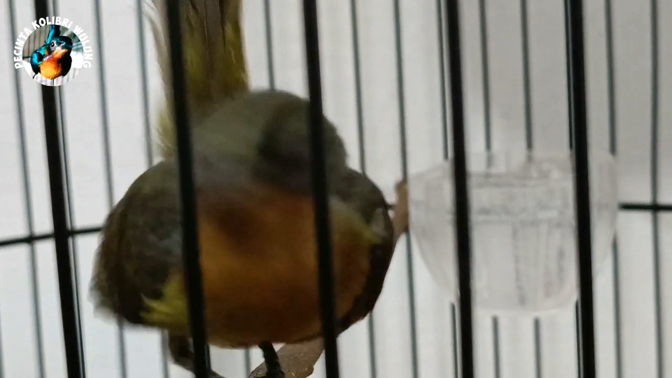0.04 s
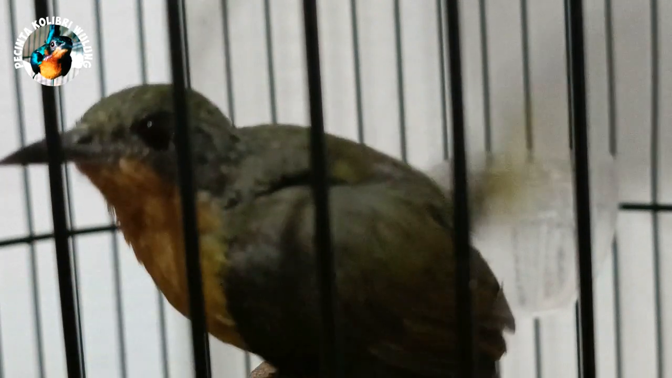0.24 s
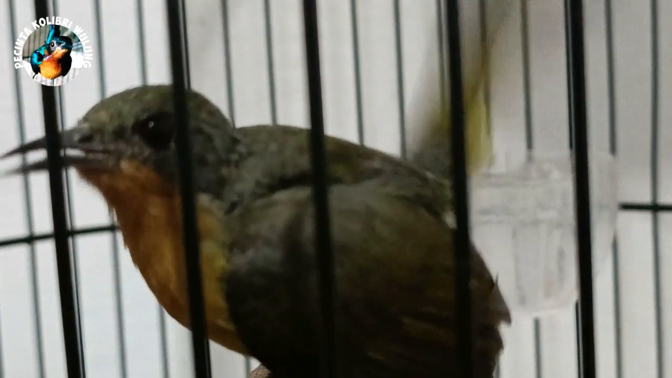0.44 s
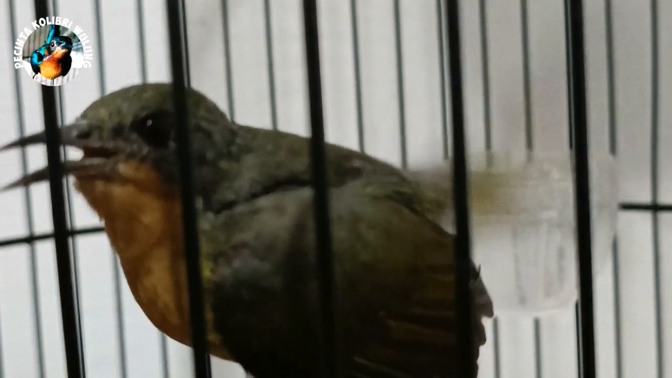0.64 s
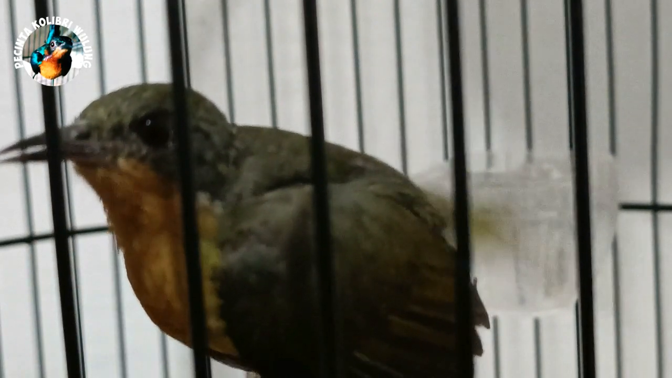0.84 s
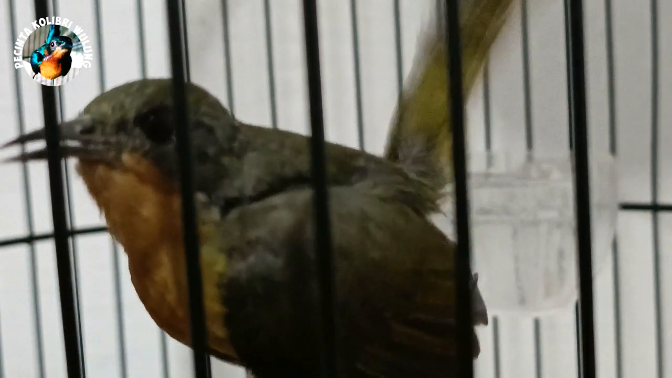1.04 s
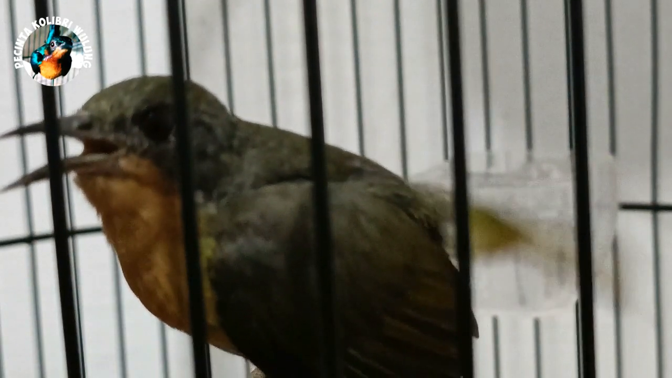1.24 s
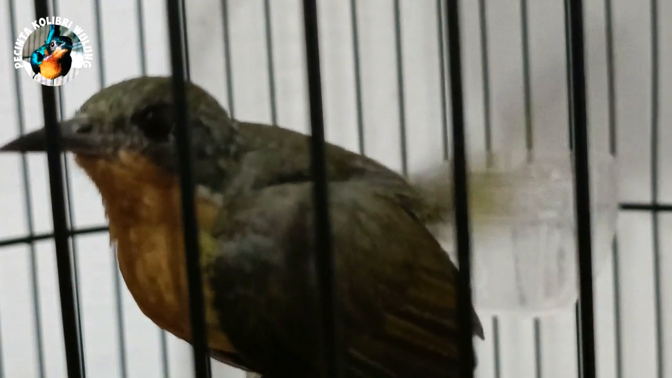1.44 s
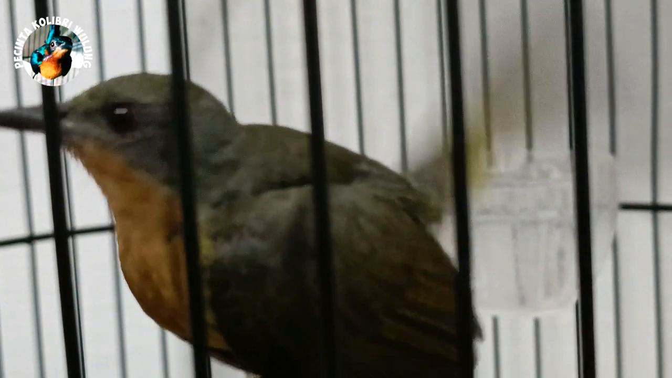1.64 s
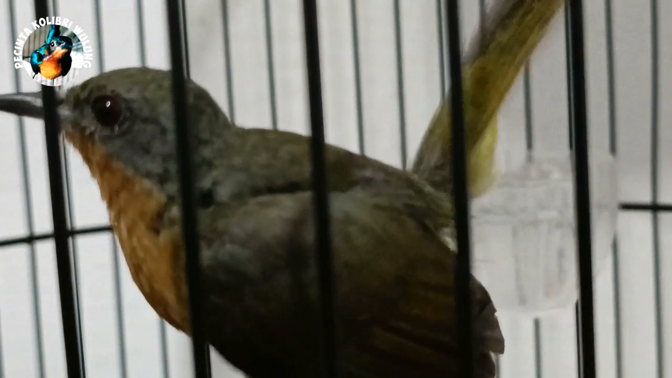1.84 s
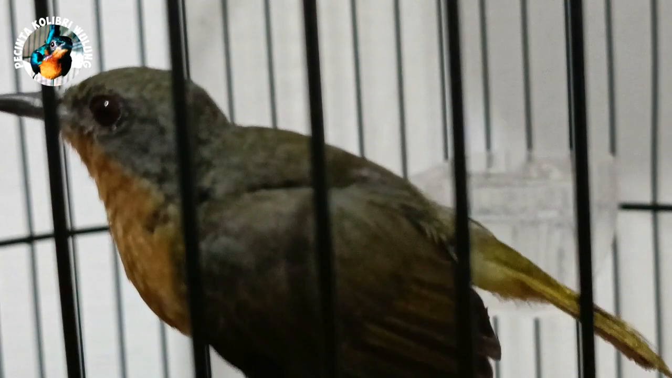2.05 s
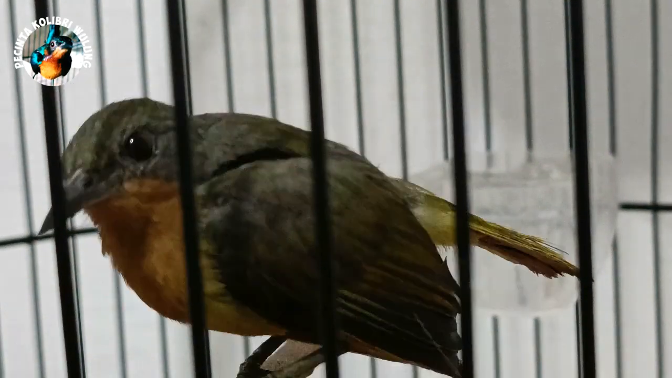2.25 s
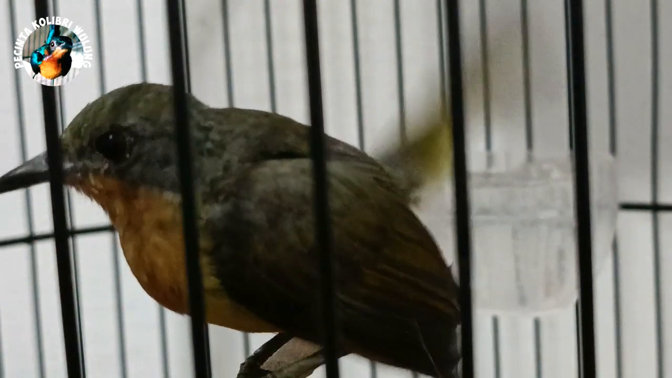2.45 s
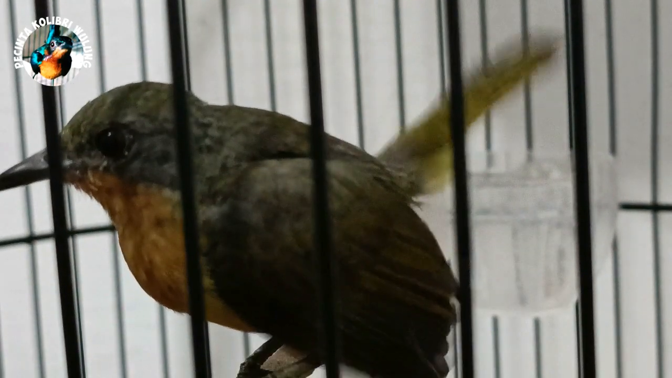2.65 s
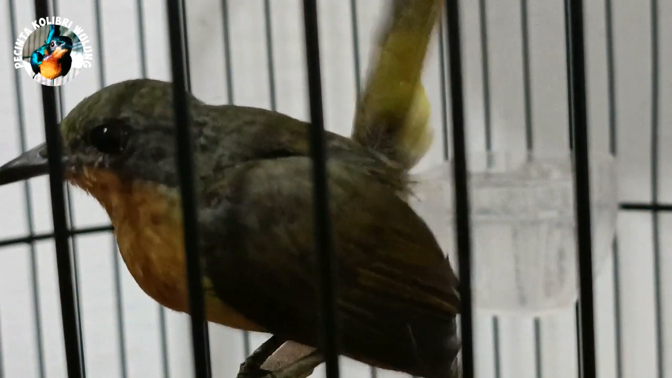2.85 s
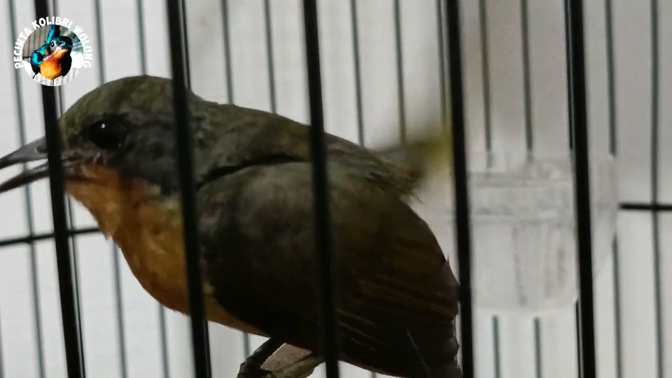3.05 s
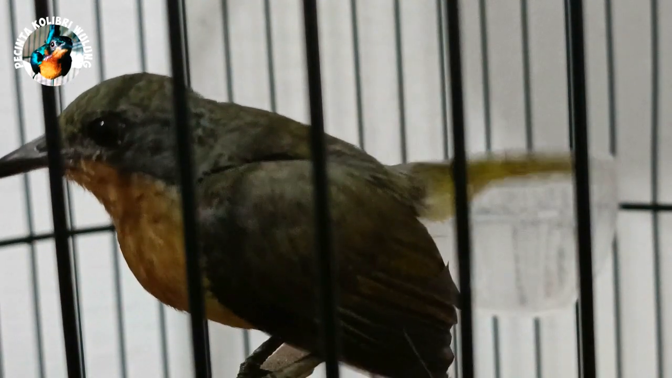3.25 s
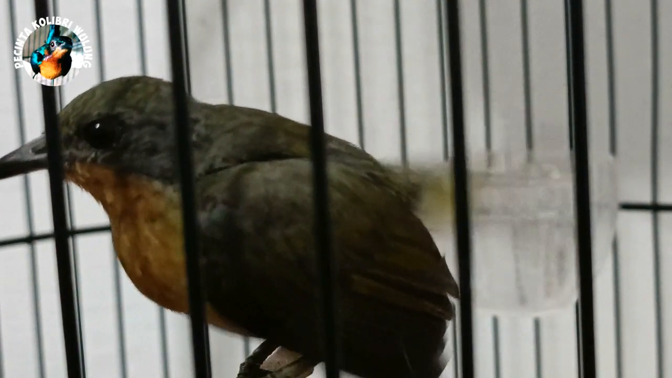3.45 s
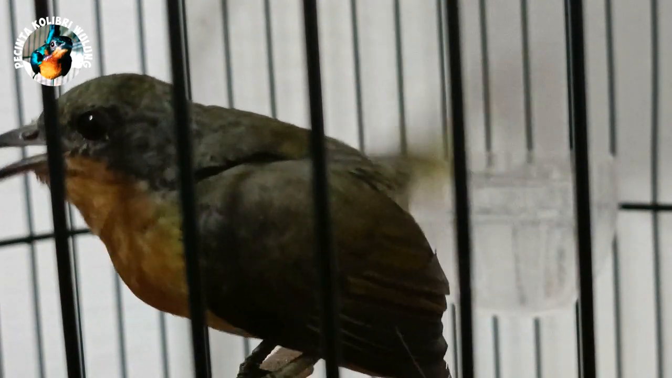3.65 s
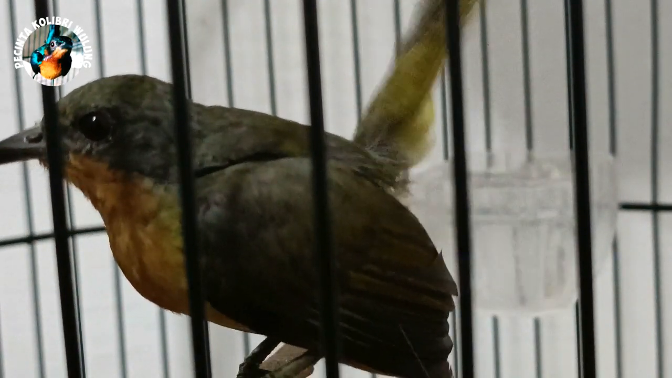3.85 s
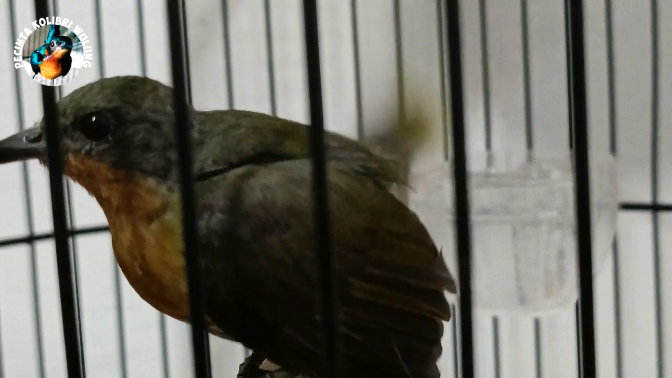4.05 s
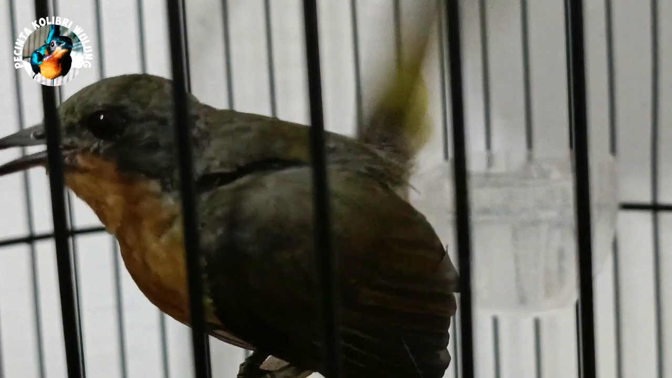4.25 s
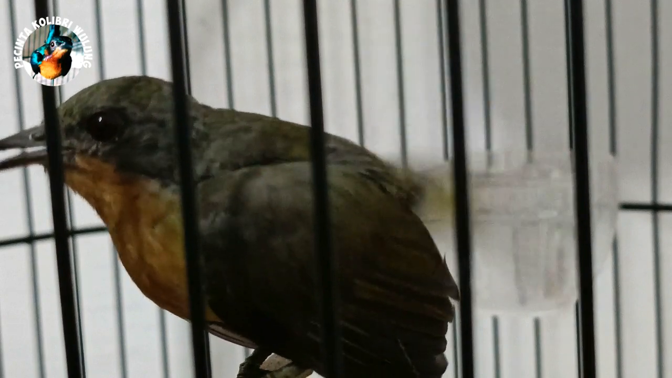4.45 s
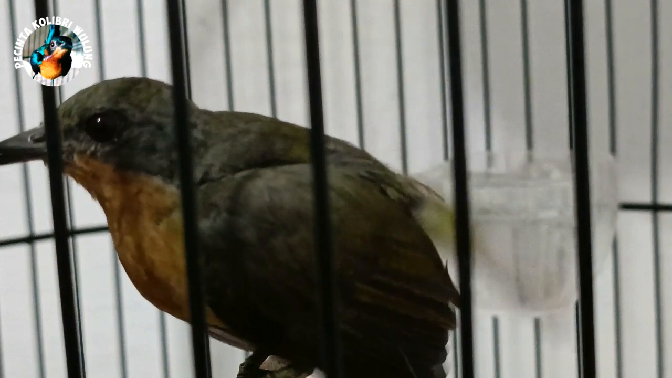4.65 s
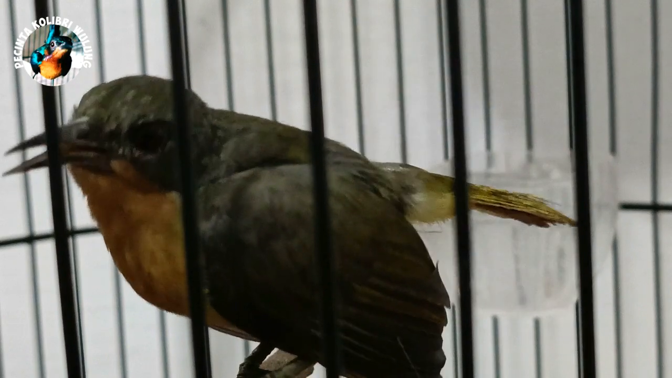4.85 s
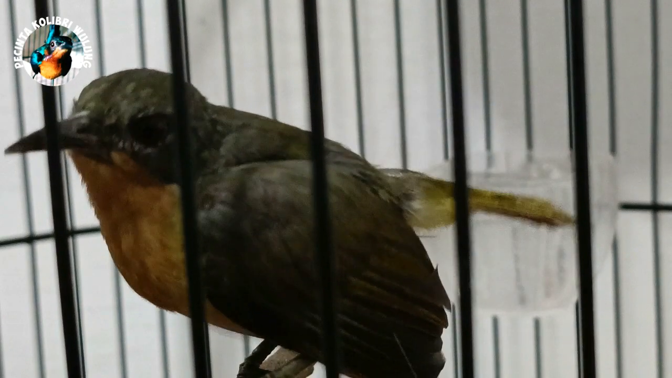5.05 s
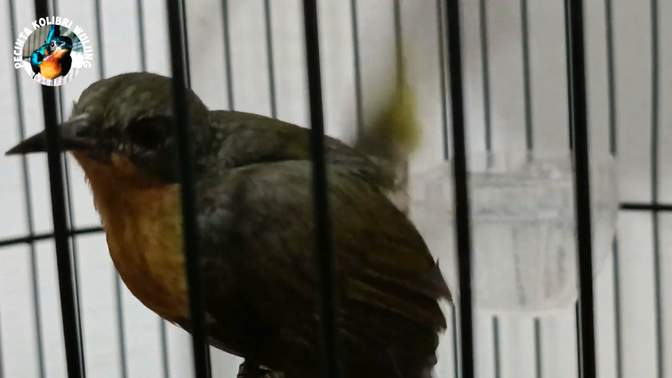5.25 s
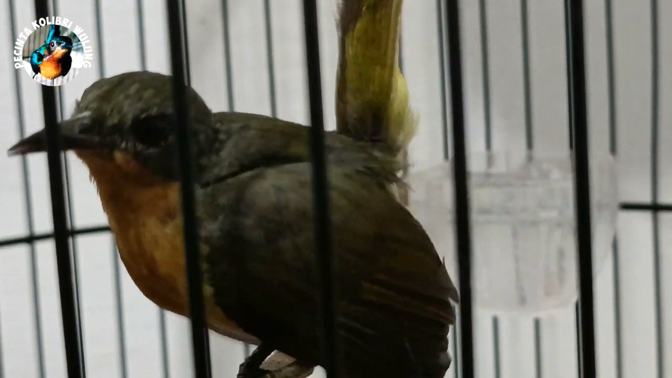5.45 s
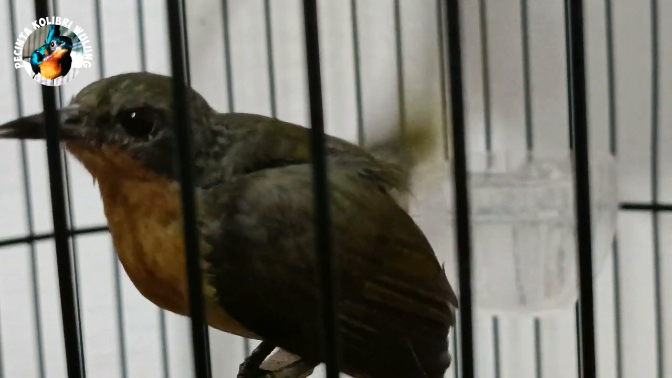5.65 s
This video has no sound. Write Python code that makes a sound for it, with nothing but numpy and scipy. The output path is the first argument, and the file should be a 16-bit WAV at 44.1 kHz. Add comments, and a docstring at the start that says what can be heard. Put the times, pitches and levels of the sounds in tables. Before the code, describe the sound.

After a faint hop on its perch, a caged bird sings three spaced pairs of piercing, gliding high whistles with slight room echo.

```python
"""Caged bird, close, quiet room

A small caged bird sings close to a two-port microphone, left of centre, after one hop on its perch.
Three pairs of whistles: two arched up-slurs, two short down-slurs, two more arches. Each is a gliding
syrinx tone with overtones, weighted by throat and beak. Noise bursts ring perch and wire for the hop.
Echoes smear the bird; crackle follows its loudness, over rumble, hiss and a low drone that comes and goes."""
import sys
import numpy as np
from scipy import signal
from scipy.fft import rfft, irfft
from scipy.io import wavfile
from scipy.ndimage import uniform_filter1d, minimum_filter1d

SR = 44100
rng = np.random.default_rng(int(sys.argv[2]) if len(sys.argv) > 2 else 0)


def int16_out(signal):
    """Quantize to a 16-bit WAV file."""
    q = np.round(np.clip(np.atleast_2d(signal).T, -1, 1) * 32767)
    wavfile.write(sys.argv[1], SR, q.astype(np.int16))


N = 251811
TIME = np.arange(N) / SR  # s
BINS = np.maximum(np.arange(N // 2 + 1) * SR / N, 1)  # Hz

# One arch: raspy scoop, steady climb, rounded top, sudden drop
# [t/s into the gesture, pitch f/Hz, relative drive level/dB, overtone strength level/dB]
ARCH_GESTURE = [(0, 1948, -36, -8), (.012, 2508, -29.5, -5), (.027, 3192, -28, 6), (.048, 3566, -31, 2.5),
                (.064, 3868, -24.5, -10.5), (.083, 4375, -17.5, -15.5), (.122, 4750, -21, -9),
                (.18, 5835, -18, -11.5), (.23, 6680, -18.5, -9), (.268, 6861, -16, -10.5),
                (.304, 6629, -18, -9), (.338, 6076, -15.5, -8.5), (.349, 5300, -24, 1),
                (.355, 3613, -34.5, 13)]
# One down-slur: bright start, steady slide, sudden drop [columns as for the arch]
DOWN_GESTURE = [(0, 6933, -35.5, 3), (.009, 7010, -27, 4), (.018, 6900, -17.5, 3), (.034, 6810, -17, -13),
                (.052, 6487, -14.5, -16), (.073, 5917, -15, -21.5), (.125, 5270, -20.5, -14),
                (.15, 4900, -18.5, -12), (.159, 4100, -20, -10), (.165, 3800, -23, -3)]
# Places in each gesture that are pinned to times in the song [t/s]
ARCH_PINS = [0, .064, .18, .355]
DOWN_PINS = [0, .073, .165]
# Arches as sung [start t/s, end of scoop t/s, mid-climb t/s, end t/s, extra depth of drop f/Hz,
# relative level/dB, extra overtones of the high part level/dB]
ARCH_NOTES = [(.504, .566, .681, .843, 150, -.5, -3), (.993, 1.055, 1.172, 1.349, -650, -.3, 7),
              (4.134, 4.204, 4.310, 4.501, 100, 0, -2), (4.738, 4.803, 4.930, 5.101, 100, -.4, -1)]
# Down-slurs as sung [start t/s, mid-slide t/s, end t/s, extra depth of drop f/Hz, relative level/dB,
# extra overtones of the high part level/dB, opening overshoot f/Hz, click before band-pass level/dB]
DOWN_NOTES = [(3.042, 3.108, 3.216, -130, -.5, 0, -50, -32.5), (3.616, 3.694, 3.772, 300, .5, -2, 600, -30)]
# Resonances of throat and beak: strongest at 4-7 kHz, weaker an octave up [f/Hz, gain level/dB]
THROAT_GAIN = [(1750, -34), (2200, -21), (3200, -17.5), (3600, -11.5), (4000, -6), (4400, -4.5), (6900, -1),
               (7400, -5.5), (8000, -4), (9500, -13.5), (11500, -24.5), (13600, -12.5), (15000, -7.5),
               (16000, -13)]
# Overtones of the syrinx, from twice the pitch upwards [relative level/dB]
OVERTONE_LEVELS = [2, -2.5, -3.5, -11, -16.5]
# Feet touching the perch [t/s, relative knock level/dB, relative wire ring level/dB]
FOOTFALLS = [(0.199, -61.5, -67), (0.212, -55.5, -54.5), (0.238, -53.5, -81)]
# Modes of the perch [f/Hz, relative level/dB, t60 t/s]
PERCH_MODES = [(690, -5, .14), (785, 0, .09), (1173, 0, 0.15), (1300, 2.5, .07), (1610, -3.5, 0.069),
               (2050, -4, 0.041), (3300, -19, 0.036)]
# Modes of the cage wire [f/Hz, relative level/dB, t60 t/s]
WIRE_MODES = [(8780, -0.5, .07), (9050, 2, .06), (8700, -2, .05), (11635, -11.5, 0.031)]
# Straight path from the bird to each microphone port [f/Hz, gain level/dB]
LEFT_PATH = [(3000, 0.5), (4400, 2), (5600, 0.5), (6800, -1.5), (9000, 0.5), (14000, 3)]
RIGHT_PATH = [(3000, -7), (4400, -1.5), (5600, -4), (6800, -3), (9000, -12.5), (14000, -9)]
# Colour of the room's echoes [f/Hz, gain level/dB]
WALL_COLOUR = [(2700, -0.5), (4300, 3), (7000, -2), (9000, -1.5), (14000, -2)]
# Sharpest ticks of the crackle [t/s, level before band-pass/dB]
SHARP_TICKS = [(.613, -37), (.825, -32), (1.16, -34), (1.337, -32), (3.111, -35), (3.118, -27),
               (3.665, -33), (3.758, -32), (4.339, -35), (4.961, -36)]
# Faint low drone in the room [t/s, level/dB]
DRONE_LEVEL = [(0, -65.5), (.5, -79.5), (1, -87), (3.5, -86), (4.6, -77.5), (5.7, -71.5)]
# Room rumble and microphone hiss [f/Hz, level/dB per Hz]
NOISE_FLOOR = [(28, -116), (48, -104), (66, -90.5), (100, -89.5), (170, -94.5), (400, -99), (900, -107),
               (2200, -113), (4600, -113), (5000, -121), (7400, -121), (7900, -115), (12000, -117),
               (13500, -112)]

HIGH_PART_HZ = (5324, 6800)  # the high part of a slur sets in over this range
OVERSHOOT_S, CLICK_DELAY_S = .014, .0012  # settling of an overshoot; start of down-slur to click
PORT_LAG_S = .000265  # the right port hears the bird this much later
ROOM_T60_S, ROOM_DB, EARLY_DB = 0.35, -9, -10.5
TOP_HZ, LIMITER_HOLD_S = 15900, .0016


def song():
    """Six whistles, and the click of the syrinx snapping open for the high-starting down-slurs."""
    whistles = np.zeros(N)
    for row in ARCH_NOTES:
        whistles += whistle(slur(ARCH_GESTURE, ARCH_PINS, row[:4], *row[4:]))
    for row in DOWN_NOTES:
        whistles += whistle(slur(DOWN_GESTURE, DOWN_PINS, row[:3], *row[3:-1]))
    click_envelope = sum(undb(db) * fade(TIME - s - CLICK_DELAY_S, .012) for s, *_, db in DOWN_NOTES)
    clicks = rng.standard_normal(N) * click_envelope
    return whistles + band(clicks, low_hz=6500, high_hz=10000)


def slur(shape, pins, times, deeper_hz, level_db, bright_db, overshoot_hz=0):
    """One note hurries or lingers between pins: rows of (t/s, pitch f/Hz, drive/dB, overtones/dB)."""
    age, pitch, drive_db, overtone_db = np.transpose(shape)
    s = np.interp(age, pins, times)
    high = np.interp(pitch, HIGH_PART_HZ, [0, 1])
    overshoot = overshoot_hz * np.exp(-(age / OVERSHOOT_S) ** 2)
    drop = deeper_hz * (age == age[-1])  # only the last point moves
    return np.transpose([s, pitch + overshoot - drop, drive_db + level_db, overtone_db + bright_db * high])


def whistle(table, waver=0.003, rasp=0.033, rasp_below_hz=3900, air_db=-14, buzz_db=7,
            flutter_db=2.5, attack_s=0.0031, release_s=0.0022):
    """A syrinx tone and its overtones slide through the fixed resonances of the throat."""
    s, pitch, drive_db, overtone_db = np.transpose(table)
    s = np.sort(s)
    on = (TIME > s[0]) & (TIME < s[-1])
    t = TIME[on]
    hz = uniform_filter1d(np.interp(t, s, pitch), size=220)

    # at low pitch the membranes are slack: they beat unevenly, buzz and let air hiss past
    slack = np.clip((rasp_below_hz - hz) / 1000, 0, 1)
    air = band(undb(air_db) * slack * rng.standard_normal(len(t)), low_hz=4260, high_hz=15990)
    # the hiss takes only half the throat's gain in dB
    air = irfft(rfft(air, N) * gain_at(BINS, THROAT_GAIN) ** .5, N)[:len(t)]
    hz = hz * (1 + waver * walk(140)[on] + rasp * slack * walk(1500)[on])
    phase = 2 * np.pi * np.cumsum(hz) / SR

    tone = gain_at(hz, THROAT_GAIN) * np.sin(phase) + air
    richness = undb(np.interp(t, s, overtone_db))
    for k, db in enumerate(OVERTONE_LEVELS, 2):
        audible = np.clip((SR / 2 - k * hz) / 4000, 0, 1)  # fade out towards half the sample rate
        strength = richness * undb(db + buzz_db * slack ** 2 * (k > 2))
        tone = tone + audible * strength * gain_at(k * hz, THROAT_GAIN) * np.sin(k * phase)

    edge = np.minimum((t - s[0]) / attack_s, (s[-1] - t) / release_s)
    gate = np.sin(np.pi / 2 * np.clip(edge, 0, 1)) ** 2
    drive = undb(np.interp(t, s, drive_db) + flutter_db * walk(120)[on])
    out = np.zeros(N)
    out[on] = np.sqrt(2) * tone * gate * drive
    return out


def hop(scuff_s=0.11, tick_s=0.051, scratch_db=-4):
    """Each foot ticks against the cage wire and scuffs along the perch: noise bursts ring their modes."""
    out = np.zeros(N)
    for s, knock_db, wire_db in FOOTFALLS:
        scuff = rng.standard_normal(N) * fade(TIME - s, scuff_s)
        tick = rng.standard_normal(N) * fade(TIME - s, tick_s)
        out += undb(knock_db) * ring(scuff / np.linalg.norm(scuff), PERCH_MODES)
        wire = ring(tick / np.linalg.norm(tick), WIRE_MODES)
        out += undb(wire_db) * (wire + undb(scratch_db) * tick)
    return out


def ring(push, modes):
    """A push rings a set of decaying modes."""
    t = TIME[:SR // 2]
    body = sum(undb(db) * fade(t, t60) * np.sin(2 * np.pi * hz * t) for hz, db, t60 in modes)
    return signal.fftconvolve(push, body)[:N]


def direct(x):
    """Straight sound from left of centre: the right port hears it later and duller."""
    near = gain_at(BINS, LEFT_PATH)
    far = gain_at(BINS, RIGHT_PATH) * np.exp(-2j * np.pi * BINS * PORT_LAG_S)
    return irfft(rfft(x) * np.array([near, far]), N)


def room(x, first_s=0.0016, early_t60_s=0.11, treble_t60_s=0.29, treble_hz=8000):
    """Dense early echoes from cage and near wall, then the room's tail, different at each port."""
    t = TIME[:int(.8 * SR)]

    def echoes(db, t60):
        """Spectrum of the sound after a cloud of decaying reflections."""
        cloud = rng.standard_normal((2, len(t))) * fade(t - first_s, t60)
        cloud = cloud / np.linalg.norm(cloud, axis=1, keepdims=True)
        return rfft(undb(db) * signal.fftconvolve(x[None], cloud, axes=1)[:, :N])

    treble = 1 / (1 + (treble_hz / BINS) ** 10)  # air and walls swallow the treble sooner
    low_tail = np.sqrt(1 - treble) * echoes(ROOM_DB, ROOM_T60_S)
    treble_tail = np.sqrt(treble) * echoes(ROOM_DB, treble_t60_s)
    early = echoes(EARLY_DB, early_t60_s)
    return irfft((early + low_tail + treble_tail) * gain_at(BINS, WALL_COLOUR), N)


def crackle(bird, per_s=105, crackle_db=-16, spread_db=4):
    """Random impulses scaled by the bird's loudness, with a few sharper ticks, all band-passed."""
    loudness = uniform_filter1d(np.abs(bird), size=220)
    spread = spread_db * np.clip(rng.standard_normal((2, N)), -2, 2)
    sizes = rng.choice([-1, 1], (2, N)) * undb(spread)
    ticks = (rng.random((2, N)) < per_s / SR) * sizes * loudness * undb(crackle_db)
    for s, db in SHARP_TICKS:
        ticks[:, int(s * SR)] += undb(db)  # alike at both ports
    return band(band(ticks, low_hz=610, high_hz=3700), low_hz=400, high_hz=4500)


def drone():
    """A narrow band of low noise, alike at both ports, sinks away and slowly swells again."""
    rumble = band(rng.standard_normal(N), low_hz=171, high_hz=240)
    return rumble / rumble.std() * undb(np.interp(TIME, *np.transpose(DRONE_LEVEL)))


def background(floor_db=0, alike_below_hz=330):
    """Faint shaped noise: room rumble, largely alike at both ports, under unrelated hiss."""
    likeness = .8 / (1 + (BINS / alike_below_hz) ** 2)
    mid, side = rfft(rng.standard_normal((2, N)))
    mid, side = mid * np.sqrt(1 + likeness), side * np.sqrt(1 - likeness)
    ports = np.array([mid + side, mid - side])
    noise = irfft(ports * gain_at(BINS, NOISE_FLOOR), N)
    return undb(floor_db) * noise * np.sqrt(SR) / 2  # scales the floor to dB per Hz


def undb(db):
    """Decibels to gain."""
    return 10 ** (np.asarray(db) / 20)


def gain_at(hz, points):
    """Gain of a (f/Hz, level/dB) spectrum at the given frequencies, interpolated over log frequency."""
    f, db = np.transpose(points)
    return undb(np.interp(np.log(hz), np.log(np.sort(f)), db))


def walk(rate):
    """Smooth random motion of unit spread, with about `rate` new values per second."""
    k = max(int(SR / rate), 1)
    steps = np.repeat(rng.standard_normal(N // k + 1), k)
    smooth = uniform_filter1d(uniform_filter1d(steps, k), k)[:N]
    return smooth / smooth.std()


def fade(t, t60):
    """Exponential decay that starts at t = 0 and falls 60 dB in t60 seconds."""
    return (t >= 0) * np.exp(-np.log(1000) * np.maximum(t, 0) / t60)


def band(x, low_hz, high_hz):
    """Gentle band-pass."""
    return signal.sosfilt(signal.butter(2, [low_hz, high_hz], "band", fs=SR, output="sos"), x)


def scene(song_db=2.77):
    """The bird in its room, as it reaches the two ports."""
    bird = undb(song_db) * song() + hop()
    return direct(bird) + room(bird) + crackle(bird) + background() + drone()


def record(dry, ceiling_db=-10.5):
    """A fast limiter, shared by both ports, holds down the loudest peaks; the top is cut steeply."""
    span = max(int(LIMITER_HOLD_S * SR), 1)
    peak = np.abs(dry).max(axis=0) + 1e-9
    allowed = np.minimum(1, undb(ceiling_db) / peak)
    gain = uniform_filter1d(minimum_filter1d(allowed, span), span)
    top_cut = signal.ellip(10, .2, 80, TOP_HZ, fs=SR, output="sos")
    return signal.sosfilt(top_cut, dry * gain)


dry = scene()
out = record(dry)
int16_out(out)
```